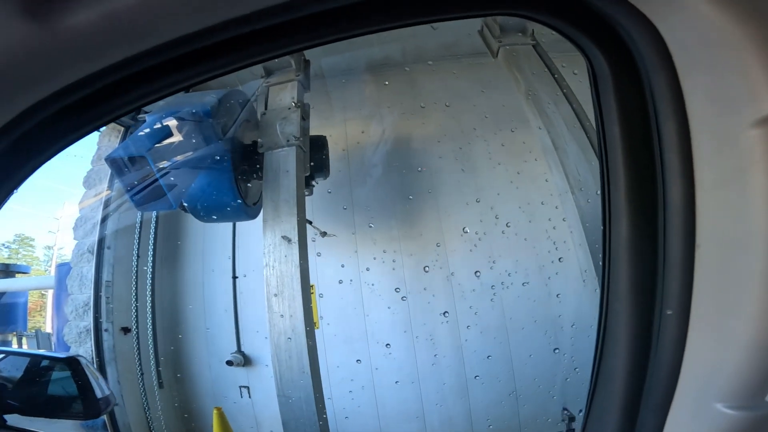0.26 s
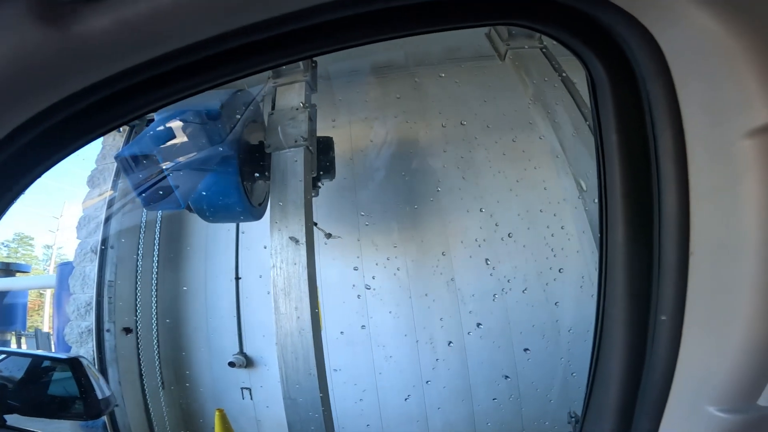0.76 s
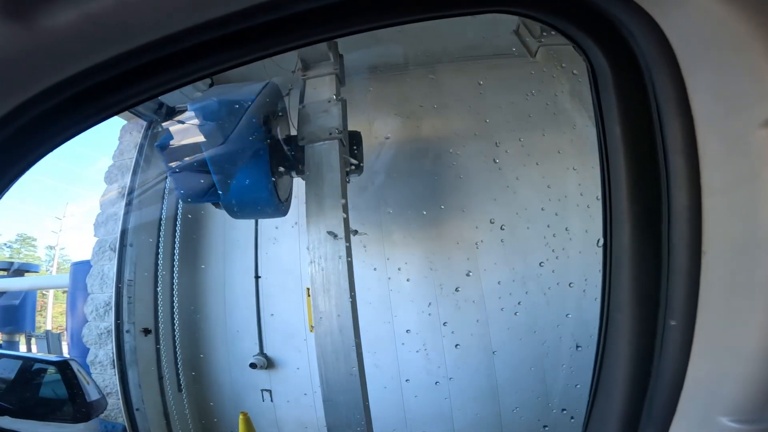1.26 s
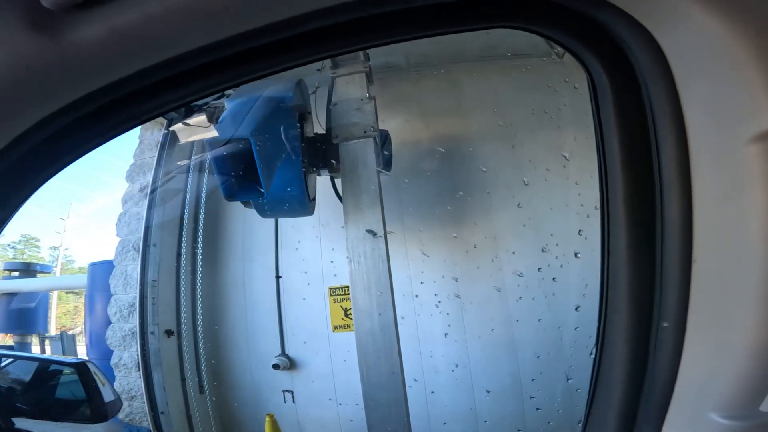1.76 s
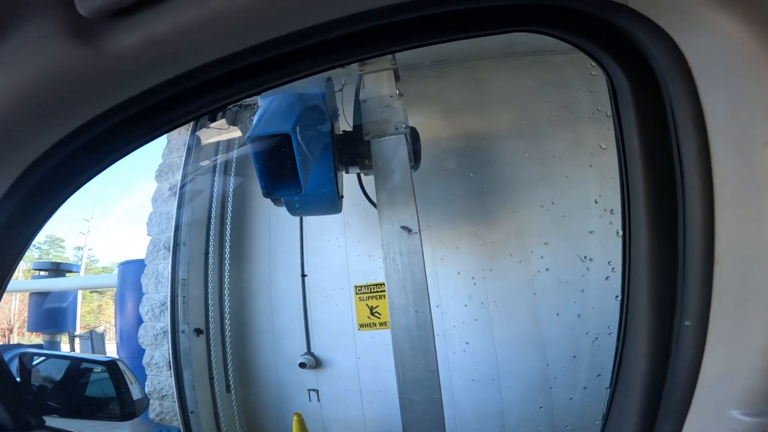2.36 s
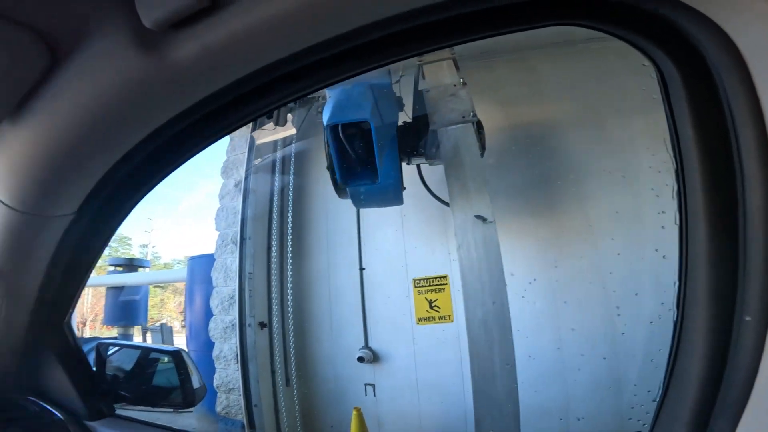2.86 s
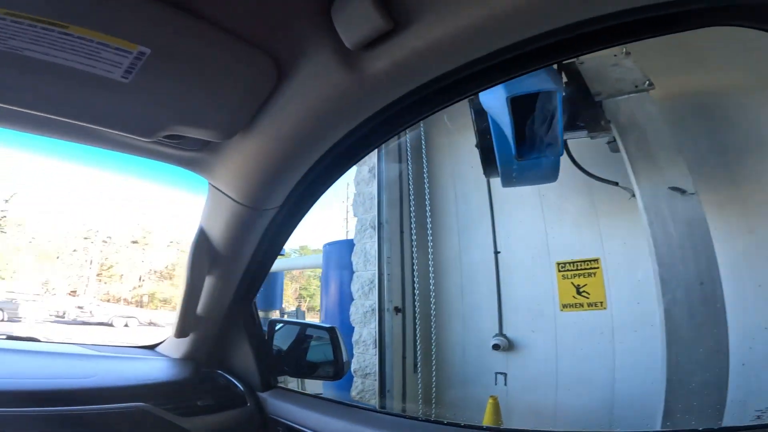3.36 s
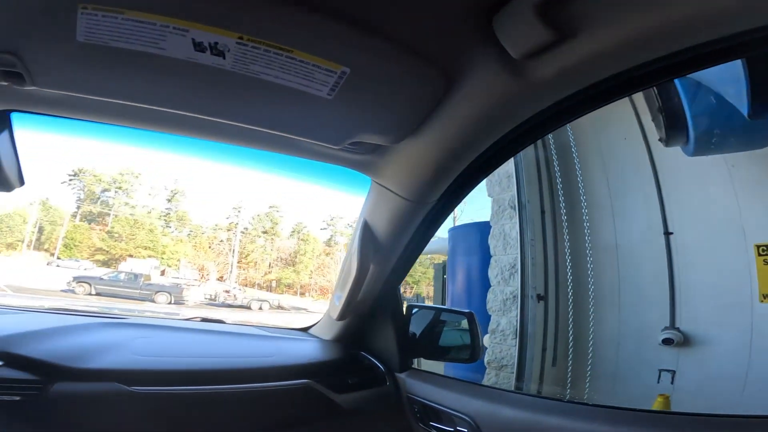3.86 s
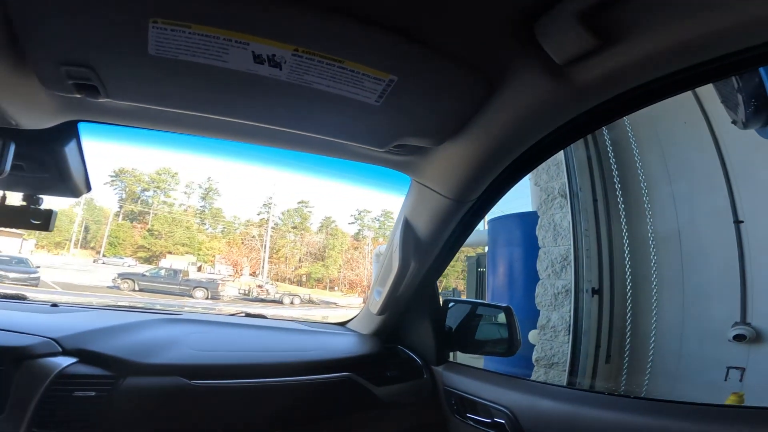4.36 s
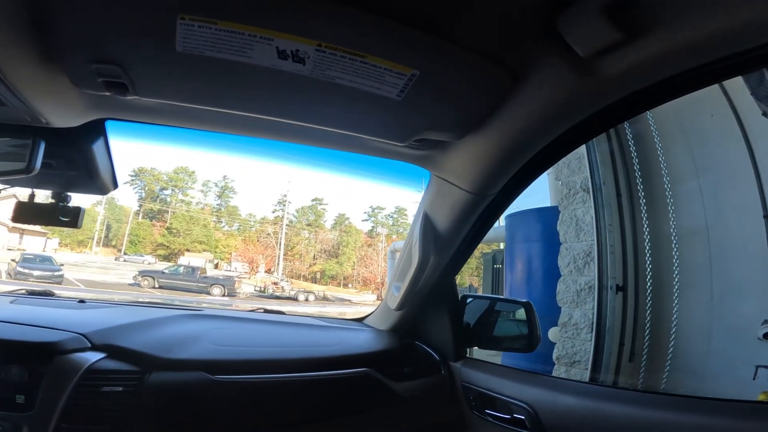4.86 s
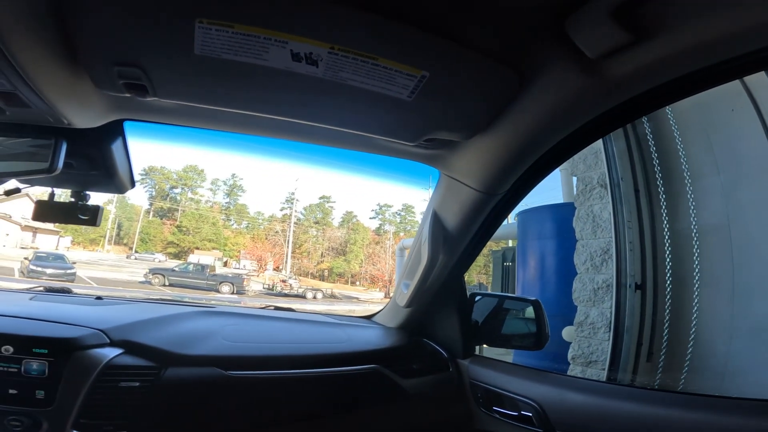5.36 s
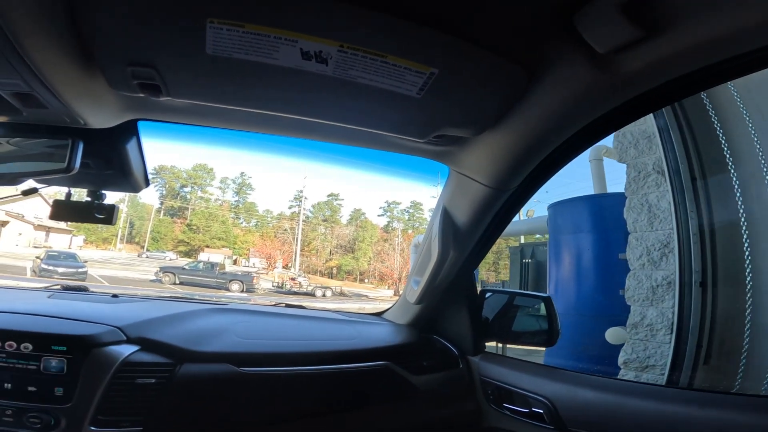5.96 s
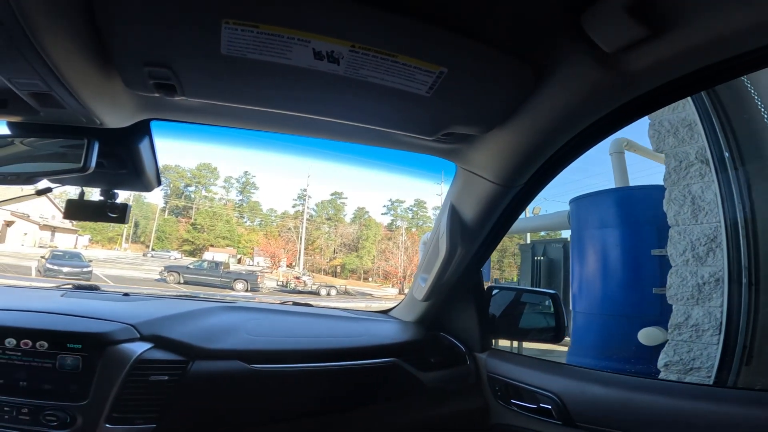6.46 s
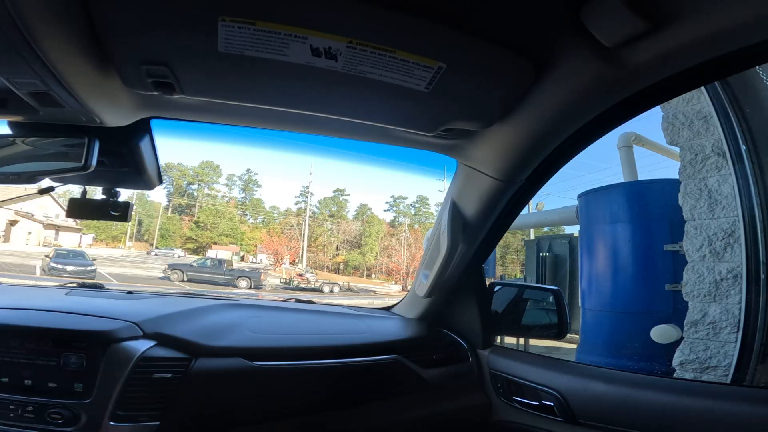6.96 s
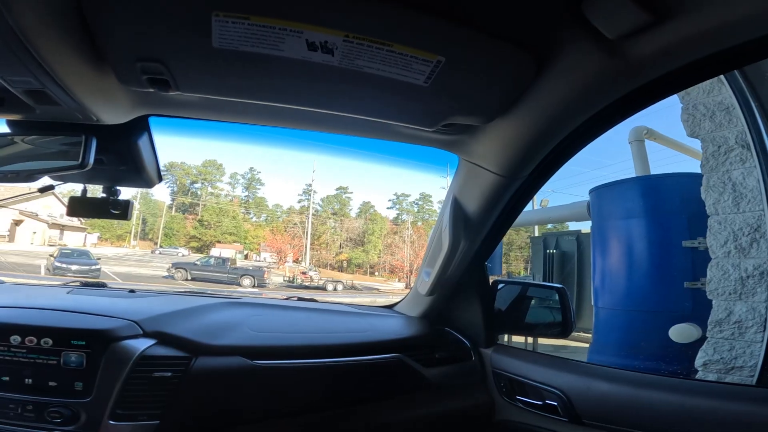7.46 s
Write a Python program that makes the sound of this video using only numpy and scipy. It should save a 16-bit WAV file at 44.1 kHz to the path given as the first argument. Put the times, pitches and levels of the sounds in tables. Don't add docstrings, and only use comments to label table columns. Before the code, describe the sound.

A cabin microphone picks up blower air pushing on a sealed vehicle: dense deep booming that flutters irregularly, with short humming swells wandering in pitch. The roar through doors and glass is dark and softened, fullest near the middle, then thinning while slow low thuds of pressure remain. A few faint taps and an almost inaudible fine spray sit far beneath. The car rolls slowly forward out of the wash.

```python
import sys
import numpy as np
from scipy import signal
from scipy.fft import next_fast_len
from scipy.io import wavfile
from scipy.ndimage import uniform_filter1d

SR = 44100
rng = np.random.default_rng(int(sys.argv[2]) if len(sys.argv) > 2 else 0)


def magnitude_from_level(level_db):
    exponent = np.asarray(level_db, float) / 20
    return 10 ** exponent


def to_wav(sig):
    pcm = np.clip(np.atleast_2d(sig), -1, 1) * 32767
    pcm = np.round(pcm).astype(np.int16)
    wavfile.write(sys.argv[1], SR, pcm.T)


N = 340893
FRAME, HOP = 8192, 2048
BUFFET_GUST, BOOM_GUST, ROAR_GUST = 1.2, 0.95, 0.23


def evened(x):
    return x / np.sqrt(np.mean(x ** 2) + 1e-20)


def unit(power):
    return power / power.sum()


def smoothed(x, first, second, second_axis):
    x = uniform_filter1d(x, size=first, axis=0)
    return evened(uniform_filter1d(x, size=second, axis=second_axis))


def read(points, hz):
    f, value = np.transpose(points)
    return np.interp(np.log(hz + 1), np.log(f + 1), value)


def peak(hz, centre_hz, width_hz):
    return 1 / (1 + (2 * (hz - centre_hz) / width_hz) ** 2)


def bandpass(x, order, low_hz, high_hz):
    return signal.sosfilt(signal.butter(order, [low_hz, high_hz], "band", fs=SR, output="sos"), x)


def swell(t, centre_s, spread_s):
    return np.exp(-.5 * ((t - centre_s) / spread_s) ** 2)


def passing(row, t):
    start_db, drift_db_per_s, lift_db, closest_s, spread_s = row
    return start_db + drift_db_per_s * t + lift_db * swell(t, closest_s, spread_s)


# time_s, gust_db
GUSTS = [(0.0, -25), (0.02, -11), (0.26, -17.5), (0.49, -14.5), (0.54, -19), (1.05, -16), (1.08, -23.5),
         (1.14, -12.5), (1.27, -17.5), (1.85, -13.5), (4.17, -18), (4.22, -19), (5.49, -14.5), (5.79, -19),
         (5.83, -16.5), (7.36, -16), (7.43, -16.5), (7.73, -18.5)]


def gust(t):
    time_s, gust_db = np.transpose(GUSTS)
    usual_db = -16
    return np.interp(t, time_s, gust_db) - usual_db


# centre_hz, width_hz, level_db
CABIN_MODES = [
    [(50, 14, -5.5), (61, 25, 3), (74, 18, 1.5)],
    [(96.4, 19, 0.5), (118, 53, -1)],
    [(143, 25, -5), (159.1, 4.7, 0.5)],
]
# start_db, drift_db_per_s, lift_db, closest_s, spread_s
BOOM_PASS = [
    (-22, -0.41, 0.77, 1.2, 0.45),
    (-23, 0.1, 2.6, 4.8, 1.5),
    (-24, -0.3, 3, 3.0, 2.4),
]


def boom(hz, t):
    treble_fall = 1 / (1 + (hz / 1500) ** 4)
    shapes = []
    for group in CABIN_MODES:
        modes = sum(magnitude_from_level(2 * db) * peak(hz, f, width) ** 1.406 for f, width, db in group)
        shapes.append(unit(treble_fall * modes))
    level_db = np.array([passing(row, t) for row in BOOM_PASS]) + BOOM_GUST * gust(t)
    return np.transpose(shapes) @ magnitude_from_level(2 * level_db)


# loudest_s, spread_s, pitch_hz, slide_hz_per_s, level_db
HUMS = [(0.25, 0.081, 58.4, 15.5, -23), (0.4, 0.11, 145.8, 4.5, -25.5), (0.5, 0.19, 71.9, 0.0, -20.5),
        (0.57, 0.16, 46.9, -22, -25), (0.78, 0.21, 58.9, 5.0, -21), (0.981, 0.14, 75.8, -3.0, -23.5),
        (1.279, 0.18, 50.1, -12.5, -20), (1.59, 0.051, 144.1, -32.5, -26.5), (1.65, 0.082, 80, -17, -27.5),
        (1.75, 0.34, 61.16, -23.0, -26.5), (2.1, 0.098, 149.7, 20.0, -19.5),
        (2.2, 0.12, 60.9, -12.5, -23.5), (2.37, 0.095, 80.1, 5.5, -25.5), (2.59, 0.15, 59.9, 5, -19),
        (2.62, 0.11, 145, 27, -24.5), (2.899, 0.062, 161.3, 16.5, -23.5), (2.957, 0.12, 66.3, -5.5, -22),
        (3.071, 0.057, 157.2, 33.5, -18.5), (3.252, 0.21, 103.2, 15, -22), (3.3, 0.14, 152.6, 28.5, -25),
        (3.44, 0.25, 74.95, 2.0, -25.5), (3.628, 0.18, 60.76, 1.5, -25.5), (3.8, 0.068, 136.3, -7, -28),
        (3.99, 0.11, 164.9, 18.5, -24.5), (4.0, 0.16, 112.8, 4.5, -23.5),
        (4.019, 0.077, 128.9, -20.5, -21.5), (4.139, 0.062, 147.3, 19, -22), (4.41, 0.13, 64.4, -3.5, -22),
        (4.609, 0.071, 99.7, 20.5, -20.5), (4.859, 0.12, 30.67, -3, -24.5),
        (4.93, 0.22, 143.0, 10.0, -24.5), (5.12, 0.42, 127.6, 1.0, -23.5), (5.45, 0.12, 140.8, 30.0, -25),
        (5.85, 0.2, 154.9, -0.5, -29), (5.96, 0.087, 130, 13.5, -21.5), (6.14, 0.25, 42.8, 3, -25.0),
        (6.48, 0.41, 103, -4.0, -25), (6.89, 0.21, 35.8, 24.0, -24.5), (7.4, 0.23, 31.5, -4.0, -25.5),
        (7.53, 0.13, 45.6, -36.5, -25)]


def standing_waves():
    slow = 16
    wander_hz, tilt_db = 1.2, 1.1
    t = np.arange(N // slow + 2) * slow / SR
    wander = smoothed(rng.standard_normal((len(t), len(HUMS))), 300, 200, 0)
    out = 0
    for (loudest_s, spread_s, pitch_hz, slide, db), drift in zip(HUMS, wander.T):
        moving_hz = pitch_hz + slide * (t - loudest_s) + wander_hz * drift
        turns = np.cumsum(moving_hz) * t[1]
        level = np.sqrt(2) * magnitude_from_level(db) * swell(t, loudest_s, spread_s)
        out = out + level * np.sin(2 * np.pi * turns)
    hum = signal.resample_poly(out, slow, 1, window=("kaiser", 12))[:N]
    return hum * magnitude_from_level([[tilt_db], [-tilt_db]])


# frequency_hz, density_db_per_hz
BUFFET_TONE = [(4, -44), (10, -8.5), (20, 14), (32, 11.5), (45, 14.5), (60, 0), (120, -64.5), (400, -150)]
# start_db, drift_db_per_s, lift_db, closest_s, spread_s
BUFFET_PASS = (-29, 0.84, 1.5, 6.5, 2)


def buffet(hz, t):
    level_db = passing(BUFFET_PASS, t) + BUFFET_GUST * gust(t)
    shape = unit(magnitude_from_level(2 * read(BUFFET_TONE, hz)))
    return np.outer(shape, magnitude_from_level(2 * level_db))


# frequency_hz, density_db_per_hz
ROAR_TONE = [(150, -4.5), (200, -4), (340, -11.5), (600, -28.5), (1150, -37.5), (2400, -49.5),
             (3300, -53.5), (3900, -59.5), (5500, -64.5), (7800, -73), (8100, -78.5), (10300, -80),
             (11000, -92), (13000, -94), (13500, -103), (15000, -112)]
# centre_hz, width_hz, change_db
PANELS = [(192, 17, -7), (328, 18, 3), (604, 22, -4), (630, 20, -3.5), (750, 25, 1.5), (906, 32, -4.5),
          (1023, 59, 4), (1360, 51, 0.5), (2630, 610, 2.5), (11700, 800, 8.5)]
# nearest_s, spread_s, centre_hz, width_hz, change_db
FACING = [(0.65, 1.7, 201.2, 16, 4.5), (1.001, 1.1, 345, 12, 3), (1.1, 1.1, 478, 27, -3),
          (1.1, 0.98, 770, 40, -1.5), (1.3, 1.2, 750, 18, 5.5), (2.2, 0.48, 800, 40, -5.5),
          (3, 0.68, 490, 15, -4.5), (2.6, .8, 750, 25, -2), (2.4, .6, 915, 20, 1), (2.4, 1, 800, 14, 2.5),
          (6.6, 1.6, 490, 20, 3), (1.9, .7, 1266, 60, -3.5), (6.4, 1.8, 180, 16, 3),
          (4.3, 2.8, 300, 23, -4), (5.799, 1.8, 641, 16, 4), (5, 2.2, 762, 16, 2), (5.8, 2, 570, 30, -2),
          (5.8025, 2, 820, 40, 2), (5.801, 1.6, 1400, 25, -2.5), (5.801, 2, 1500, 20, 4),
          (5.3, 2.2, 930, 70, -3), (7, 2.3, 760, 21, -2), (.8, .8, 470, 45, -1.5), (0.59, 1.1, 200, 24, 7),
          (3.2, 0.42, 300, 43, 5), (7.55, 0.16, 300, 60, 5), (4.1, 0.39, 590, 130, 4),
          (6.84, .2, 330, 71, -3.5)]
# low_hz, high_hz
ROAR_BANDS = [(180, 400), (400, 620), (620, 790), (790, 890), (850, 2000), (2000, 9000)]
PATHS_HZ = [260, 450, 720, 830, 1200, 4000]
# start_db, drift_db_per_s, lift_db, closest_s, spread_s
ROAR_PASS = [
    (-29, -.1, 4.5, 3.73, 1.3),
    (-41, 0.17, 6, 4.42, 1.5),
    (-48, 0.38, 1.5, 3.8, 0.52),
    (-51.5, -0.4, -0.5, 4.4, 0.92),
    (-44.5, -0.28, 4, 4.1, 0.45),
    (-50.5, -.4, -2, 2.8, 0.74),
]


def roar(hz, t):
    panel_db = sum(db * peak(hz, f, width) for f, width, db in PANELS)
    colour = magnitude_from_level(2 * (read(ROAR_TONE, hz) + panel_db))
    colour = colour / (1 + (140 / (hz + 1)) ** 12)
    change_db = []
    for row, (low, high) in zip(ROAR_PASS, ROAR_BANDS):
        usual_db = 10 * np.log10(colour[(hz >= low) & (hz < high)].sum())
        change_db.append(passing(row, t) - usual_db)
    change_db = np.array(change_db) + ROAR_GUST * gust(t)
    blend = np.array([read(list(zip(PATHS_HZ, row)), hz) for row in np.eye(len(PATHS_HZ))])
    facing_shapes = np.transpose([db * peak(hz, f, width) for _, _, f, width, db in FACING])
    facing_db = facing_shapes @ np.array([swell(t, s, spread) for s, spread, *_ in FACING])
    return colour[:, None] * magnitude_from_level(2 * (blend.T @ change_db + facing_db))


# centre_hz, width_hz
BLADE_TONES = [
    (237, 24),
    (706, 35),
    (940, 55),
    (1408, 40),
]
# start_db, drift_db_per_s, lift_db, closest_s, spread_s
BLADE_PASS = [
    (-58.5, 1, 2.7, 4.2, 0.55),
    (-51.5, -0.42, 4.6, 2.8, 0.98),
    (-65.5, -.3, 8, 3.9, .6),
]


def blades(hz, t):
    shapes = [unit(peak(hz, f, width) ** 2) for f, width in BLADE_TONES]
    first_db = np.full(len(t), -36)
    level_db = np.vstack([first_db, *[passing(row, t) for row in BLADE_PASS]])
    return np.transpose(shapes) @ magnitude_from_level(2 * level_db)


# frequency_hz, coherence
COHERENCE = [(30, .999), (100, .998), (200, .985), (420, .93), (590, .82), (850, .9), (1300, .82),
             (2500, .72), (3300, .62), (4200, .5), (8000, .35), (10000, .4), (11500, 0)]
# frequency_hz, lead_rad
LEAD = [(60, -.05), (100, -.08), (300, -.4), (550, -.6), (780, -.9), (1000, -.55), (1500, -.7),
        (2400, -.75), (3000, -1.05), (4500, -.1), (9000, -.02)]
# frequency_hz, difference_db
TILT = [(30, 1.9), (60, 1.7), (125, 1.2), (250, 1.5), (500, 2), (1000, 2.3), (2090, 2.8), (4000, 2.4),
        (8000, 1.8), (12000, 2.5)]


def air(power, hz, patchy_db, echo_db):
    a, b, c, d, patches, echoes = rng.standard_normal((power.shape[1], len(hz), 6)).T
    patches = smoothed(patches, 48, 3, 1)
    echoes = smoothed(echoes, 10, 35, 1)
    same = np.clip(read(COHERENCE, hz), -1, 1)[:, None]
    first = a + 1j * b
    second = same * first + np.sqrt(1 - same ** 2) * (c + 1j * d)
    lean = (magnitude_from_level(read(TILT, hz) / 2) * np.exp(.5j * read(LEAD, hz)))[:, None]
    texture = magnitude_from_level(patchy_db * patches + echo_db * echoes)
    z = np.array([first * lean, second / lean]) * np.sqrt(power) * texture
    return signal.istft(z, nperseg=FRAME, noverlap=FRAME - HOP)[1][:, :N]


# start_s, peak_db, length_ms, snap_db (snap over tap)
TICKS = [(.27, -54, 2.5, -26), (.4873, -45.5, 1.3, -13), (1.4300, -59, 2, -4), (1.575, -68, 4, -8),
         (2.015, -69, 4, -7), (2.166, -62, 3, -6), (2.315, -67, 4, -8), (2.895, -70, 4, -9),
         (3.348, -68, 4, -9), (3.975, -54, 4.5, -20), (4.103, -68, 4, -8), (4.340, -63, 4.5, -7),
         (4.420, -69, 4.5, -7), (4.855, -68, 4, -7), (5.025, -69, 4, -8), (5.275, -69, 4, -8),
         (5.69, -66, 1.2, -8), (5.825, -69, 4, -8), (6.155, -69, 4, -8), (6.575, -71, 4, -8),
         (6.645, -70, 4, -8), (6.815, -71, 4, -8), (7.445, -69, 4, -8)]


def ticks():
    out, t = np.zeros(N), np.arange(1500) / SR
    bursts = rng.standard_normal((len(TICKS), len(t)))
    taps = bandpass(bursts, 3, 2800, 6000)
    snaps = bandpass(bursts, 2, 8000, 13000)
    for (start_s, peak_db, length_ms, snap_db), tap, snap in zip(TICKS, taps, snaps):
        u = 1000 * t / max(length_ms, .2)
        pulse = u * np.exp(1 - u)
        out[round(start_s * SR):][:len(t)] += magnitude_from_level(peak_db) * (tap + magnitude_from_level(snap_db) * snap) * pulse
    return out * magnitude_from_level([[1.5], [-1.5]])


# start_db, drift_db_per_s, lift_db, closest_s, spread_s
FLICKER_PASS = (-82.5, 0, 5, 3.5, 2)


def flicker():
    specks_per_s, finest_db = 30, -11
    hits = rng.random((2, N)) < specks_per_s / SR
    specks = hits * magnitude_from_level(2.5 * np.minimum(rng.exponential(1, (2, N)), 3))
    shared = specks + .6 * specks[::-1]
    puffs = signal.oaconvolve(shared, np.hanning(700)[None], "same") * rng.standard_normal(N)
    bright = bandpass(puffs, 2, 9000, 10800) + magnitude_from_level(finest_db) * bandpass(puffs, 2, 11000, 14000)
    return magnitude_from_level(passing(FLICKER_PASS, np.arange(N) / SR) - 12) * bright


def whine():
    pitch_hz, waver_hz, level_db = 11762, 40, -99
    drift = evened(uniform_filter1d(rng.standard_normal(N), size=2000))
    return magnitude_from_level(level_db) * np.sin(2 * np.pi * np.cumsum(pitch_hz + waver_hz * drift) / SR)


def scene():
    hz = np.fft.rfftfreq(FRAME, 1 / SR)
    t = np.arange(N // HOP + 5) * HOP / SR
    power = boom(hz, t) + buffet(hz, t) + roar(hz, t) + blades(hz, t)
    blowers = magnitude_from_level(1.86) * air(power, hz, patchy_db=0.5, echo_db=-0.21)
    return blowers + standing_waves() + ticks() + flicker() + whine()


def top_cut(x):
    return signal.sosfilt(signal.butter(12, 15100, fs=SR, output="sos"), x)


def record(dry):
    bass = signal.sosfiltfilt(signal.butter(2, 300, fs=SR, output="sos"), dry)
    envelope = abs(signal.hilbert(bass.mean(0), next_fast_len(N))[:N])
    peak_db = 20 * np.log10(envelope + 1e-6)
    t = np.arange(N) / SR
    fall_db = 100.0 * t
    held_db = np.maximum.accumulate(peak_db + fall_db) - fall_db
    over_db = np.maximum(held_db + 10.5, 0)
    duck_db = uniform_filter1d(uniform_filter1d(over_db, size=250), size=120)
    limited = bass / magnitude_from_level(0.64 * duck_db - 0.5) + (dry - bass) / magnitude_from_level(0.23 * duck_db)
    edge_s = .012
    fade = np.interp(t, [0, edge_s, N / SR - edge_s, N / SR], [.8, 1, 1, .12])
    return top_cut(limited * fade)


dry = scene()
out = record(dry)
to_wav(out)
```